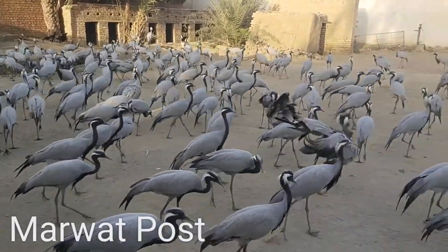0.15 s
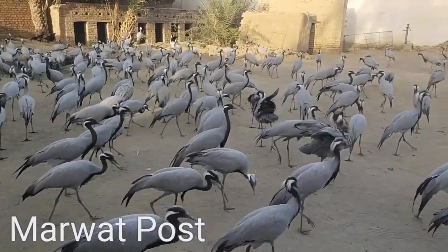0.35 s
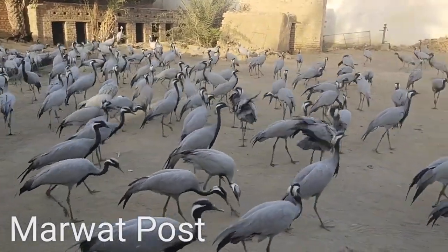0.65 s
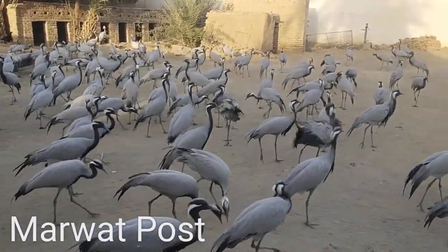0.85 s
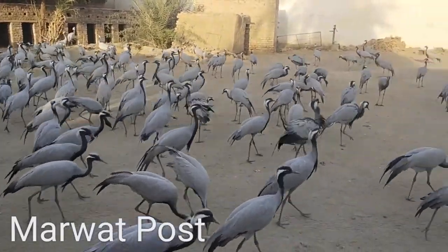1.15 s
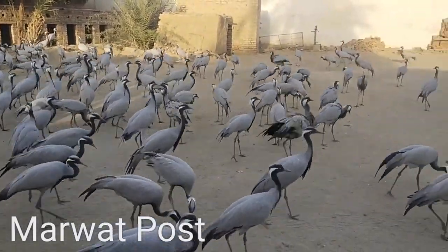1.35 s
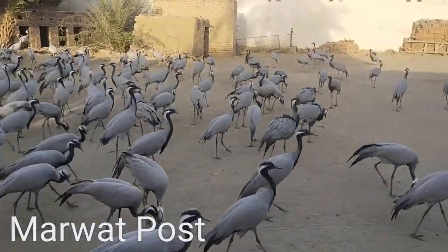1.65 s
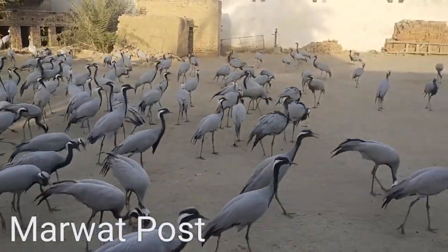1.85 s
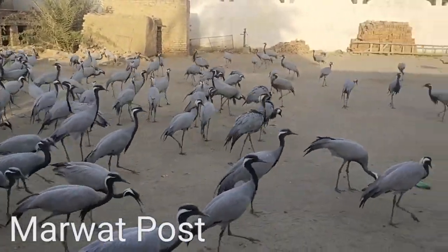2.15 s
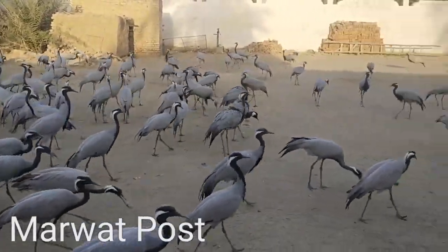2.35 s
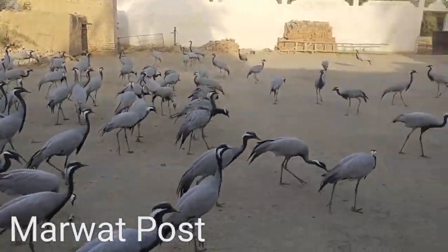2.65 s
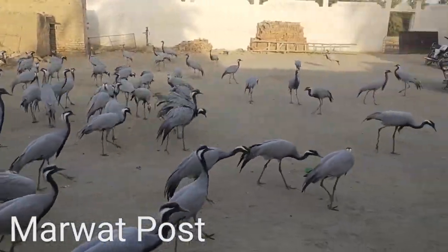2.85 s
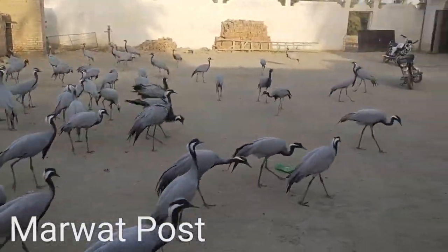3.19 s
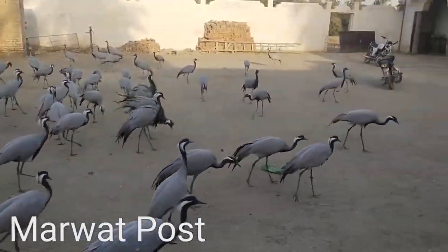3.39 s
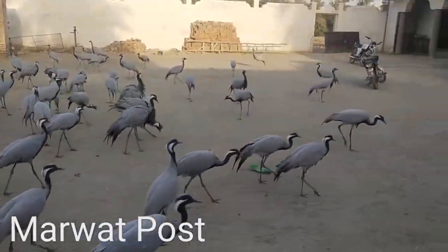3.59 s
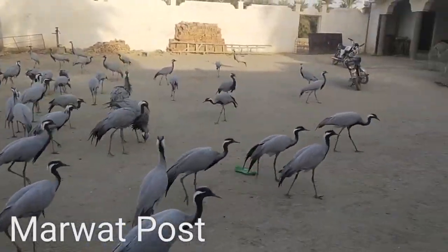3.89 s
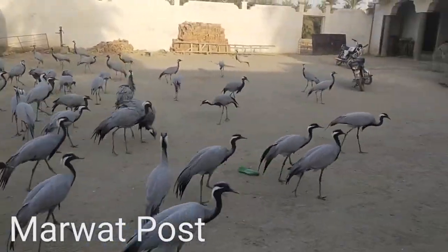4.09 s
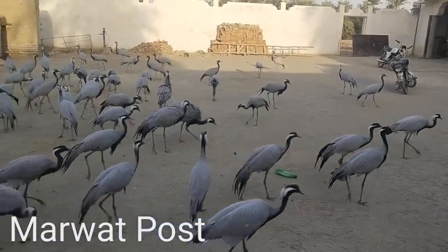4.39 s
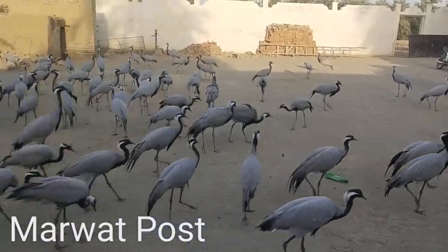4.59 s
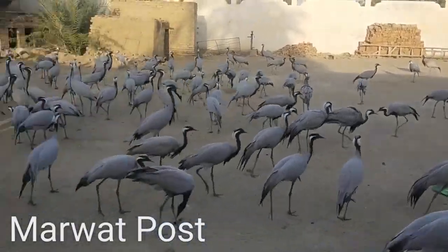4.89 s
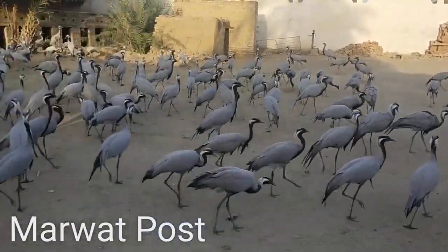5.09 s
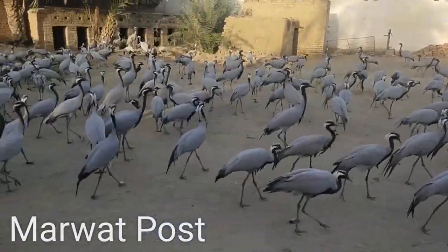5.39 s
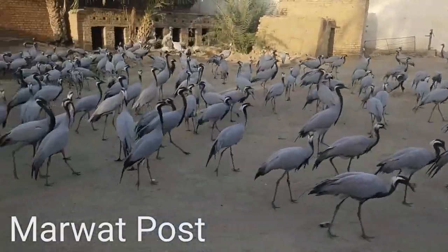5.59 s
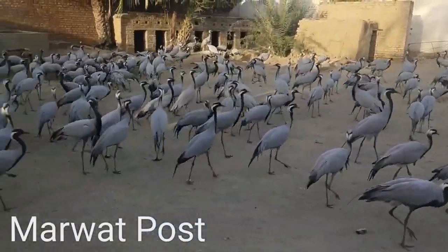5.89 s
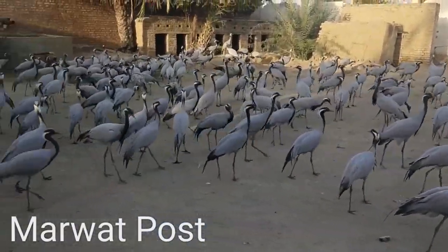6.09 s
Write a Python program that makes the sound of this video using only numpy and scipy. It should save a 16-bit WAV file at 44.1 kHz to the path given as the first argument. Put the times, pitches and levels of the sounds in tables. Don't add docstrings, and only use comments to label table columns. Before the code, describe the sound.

Scores of cranes call together in a walled dirt courtyard. Distant birds blur into a constant fluttering chorus, while nearer ones throw out short hoarse bugles and hard pulsed rattles. Breathy rasps burst from the closest throats. The clamour surges and dips, with brief hushes, over a faint low village hum. Close handheld stereo phone, slightly overloaded, with short wall echoes and a sparse, speckled treble.

```python
import sys
import numpy as np
from scipy import signal
from scipy.fft import rfft, irfft, next_fast_len
from scipy.io import wavfile
from scipy.ndimage import uniform_filter1d, map_coordinates

SR = 44100
rng = np.random.default_rng(int(sys.argv[2]) if len(sys.argv) > 2 else 0)


def gain_from_db(level_db):
    decades = np.asarray(level_db, float) / 20
    return 10 ** decades


def dump(signal):
    limited = np.clip(np.atleast_2d(signal).T, -1, 1)
    pcm = np.round(limited * 32767).astype(np.int16)
    wavfile.write(sys.argv[1], SR, pcm)


N = 275184


def unit(x):
    return x / np.sqrt(np.mean(x ** 2) + 1e-20)


def along(points, hz):
    f, v = np.transpose(points)
    return np.interp(np.log(hz + 1), np.log(f + 1), v)


def curve(rows):
    return np.interp(np.arange(N) / SR, *np.transpose(rows))


def bell(middle_s, half_s):
    return np.exp(-((np.arange(N) / SR - middle_s) / half_s) ** 2)


def wobble(rate_hz, size=N):
    knots = int(N * rate_hz / SR) + 4 if size == N else 400
    return map_coordinates(rng.standard_normal(knots), [np.arange(size) * rate_hz / SR])


def filtered(x, response):
    m = next_fast_len(N + 8192)
    return irfft(rfft(x, m) * response(np.fft.rfftfreq(m, 1 / SR)), m)[..., :N]


def noise(spectrum, alike):
    z = signal.stft(rng.standard_normal((2, N)), nperseg=512)[2]
    field = rng.standard_normal(z.shape[1:])
    field = uniform_filter1d(uniform_filter1d(field, size=5, axis=0), size=10, axis=1)
    patchy = signal.istft(z * gain_from_db(4.5 * unit(field)), nperseg=512)[1][:, :N]
    a, b = filtered(patchy, lambda hz: gain_from_db(along(spectrum, hz)))
    turn = np.arccos(np.clip(alike, 0, 1)) / 2
    common, differing = np.cos(turn) * a, np.sin(turn) * b
    return unit(np.array([common + differing, common - differing]))


# frequency in Hz, level in dB re first tone.
OVERTONES = [(1400, -8), (2600, -11), (3200, -21), (4800, -23), (7500, -30.5), (9000, -69)]
FLUTTER_SHARP = 1.5
OCTAVE_PIVOT = 2.6
FULL_FLUTTER_HZ = 1250


def cry(length_s, hz0, hz1, flutter_hz, flutter, hoarse, attack_s=0.028, shake_db=3, scoop=0.0336,
        dull_db=0):
    t = np.arange(int((length_s + 0.065) * SR)) / SR
    glide_hz = np.interp(t, [0, length_s], [hz0, hz1])
    waver = hoarse * max(FULL_FLUTTER_HZ / hz0, 1) ** 2 * wobble(140.03, size=len(t))
    pitch_hz = glide_hz * (1 - scoop * np.exp(-t / 0.02073) + waver)
    phase = 2 * np.pi * (np.cumsum(pitch_hz) / SR + rng.random())
    tone = np.sin(phase)
    for k in range(2, 6):
        overtone_db = along(OVERTONES, k * hz0) - dull_db * (k - OCTAVE_PIVOT)
        tone = tone + gain_from_db(overtone_db) * np.sin(k * phase)
    beat = 2 * np.pi * np.cumsum(flutter_hz * (1 + 0.027 * wobble(34.8, size=len(t)))) / SR
    depth = FLUTTER_SHARP * flutter * min(hz0 / FULL_FLUTTER_HZ, 1) ** 2
    shake = gain_from_db(shake_db * wobble(91.2, size=len(t)))
    voice = unit(tone * np.exp(depth * np.cos(beat)) * shake)
    return t, voice * np.clip(t / attack_s, 0, 1) * np.clip((length_s + 0.04 - t) / 0.043, 0, 1)


def chopped(t, rate_hz, rise, fall, leak):
    u = t * rate_hz % 1
    return unit(leak + np.clip(u / rise, 0, 1) * np.exp(-(u / fall) ** 2))


def add(out, s, sound, spread_db, spread_lag, place=None):
    pan, lag = rng.standard_normal(2) if place is None else place
    for c, sign in enumerate((1, -1)):
        start = round(s * SR + sign * spread_lag * lag)
        heard = sound[max(-start, 0):]
        out[c, max(start, 0):][:len(heard)] += gain_from_db(sign * spread_db * pan) * heard


# start in seconds,
# # length in seconds, first pitch in Hz, last pitch in Hz, level in dB.
NEAREST = [(-.04, 0.08, 1590, 1540, -15.5), (.045, .065, 1480, 1080, -18.5), (.15, 0.16, 1680, 1590, -29.5),
           (.66, 0.099, 1200, 1020, -26.5), (3.2, .1, 1420, 1130, -18.5), (4.68, 0.075, 3620, 3520, -34),
           (4.68, .09, 4750, 4650, -31.5), (4.81, 0.088, 5050, 5250, -28.5), (4.8, .16, 2550, 2500, -29),
           (5.72, 0.052, 2300, 2380, -27), (3.415, .12, 1265, 1310, -14.5), (2.5, .1, 700, 770, -31.5),
           (2.5, .2, 1560, 1600, -26.5), (.7, .06, 1100, 1060, -24), (5.13, 0.14, 1980, 1900, -27),
           (1, 0.066, 350, 450, -44), (3.14, 0.09, 770, 790, -25), (3.665, .015, 2050, 1950, -21),
           (3.675, .05, 2480, 2420, -21), (5.44, 0.1, 2340, 2260, -30), (3.928, 0.19, 834, 758, -30.5),
           (5.848, 0.11, 1459, 1387, -47), (0.7, .095, 940, 820, -21), (1.75, .16, 2466, 2286, -20.5),
           (1.745, 0.17, 1110, 1130, -23), (1.756, 0.16, 1330, 1410, -22), (2.448, 0.16, 1870, 1740, -20),
           (3.03, 0.1, 1800, 1560, -21), (3.14, 0.13, 1480, 1370, -13), (3.199, 0.15, 1259, 1100, -27),
           (3.418, 0.17, 1140, 1190, -18), (3.574, 0.1, 2290, 2460, -22), (3.674, 0.076, 817, 737, -24.5),
           (3.89, 0.1, 1600, 1540, -17), (4.64, 0.14, 1075, 1060, -20), (4.901, 0.16, 1560, 1520, -23.5),
           (5.073, 0.1, 2620, 2560, -23), (5.2, 0.07, 1620, 1590, -18), (6.032, 0.24, 1320, 1360, -17.5)]
NEAR_FLUTTER_HZ, NEAR_FLUTTER_DEPTH = 127.9, 0.66


def nearest():
    out = np.zeros((2, N + SR))
    for s, length_s, hz0, hz1, db in NEAREST:
        t, voice = cry(length_s, hz0, hz1, NEAR_FLUTTER_HZ, NEAR_FLUTTER_DEPTH, hoarse=.004,
                       attack_s=.012, shake_db=1.2)
        chop = chopped(t, 31, rise=.2, fall=.6, leak=1.7)
        add(out, s - .012, gain_from_db(db) * voice * chop, spread_db=1, spread_lag=.3)
    return out[:, :N]


# time in seconds, level in dB.
FLOCK = [(0, -17.5), (.28, -17), (.51, -13.5), (.8, -22), (1.15, -18), (1.5, -13.5), (2.05, -18.5),
         (2.51, -16), (2.95, -23), (3.21, -15), (3.38, -21), (3.7, -17.5), (4.05, -14.5), (4.6, -19),
         (5.24, -15.5), (5.76, -15), (6.01, -17), (6.24, -15.5)]
# middle in seconds, half length in seconds, depth in dB.
LULLS = [
    (0.994, 0.086, -2),
    (1.697, 0.15, -17),
    (2.244, 0.047, -5.5),
    (2.76, 0.11, -8),
    (3.794, 0.046, -42),
    (4.237, 0.065, -14),
    (5.455, 0.19, -11.5),
]


def flock_effort_db():
    return curve(FLOCK) + sum(db * bell(s, half_s) for s, half_s, db in LULLS)


def far_birds(count):
    out = np.zeros((2, N + SR))
    for when, how_long, high, glide, pace in rng.random((count, 5)):
        hz = 830 * 3.2 ** high ** .9
        t, voice = cry(.1 + .2 * how_long, hz, hz * (.86 + .17 * glide), flutter_hz=100 + 90 * pace,
                       flutter=0.51, hoarse=0.035)
        chop = chopped(t, 28 + 9 * pace, rise=0.37, fall=0.27, leak=0.32)
        add(out, when * (N / SR + .2) - .2, voice * chop, spread_db=3.0, spread_lag=8.4)
    out = out[:, :N]
    return out / np.sqrt(np.abs(uniform_filter1d(np.mean(out ** 2, 0), size=6000)) + 1e-9)


# time in seconds, turn away 0-1.
SWING = [
    (0, 0),
    (.8, 0),
    (1.7, 1),
    (3, 0.93),
    (4.2, 1),
    (5.4, 0.23),
    (6.24, 0.1),
]
# frequency in Hz, density in dB per Hz.
HUM = [(15, -62), (25, -32), (59, -27.5), (184, -6), (348, -17.5), (498, -9), (600, -6), (780, -7.5),
       (1320, -120)]
HUM_DB, HUM_SHADOW_DB = -45, -5.5
HUM_GROWS = 0.29


def hum(swell_db):
    hum_db = HUM_DB + HUM_SHADOW_DB * curve(SWING) + HUM_GROWS * swell_db
    return gain_from_db(hum_db) * noise(HUM, alike=0.85)


def pulsing(voices, power):
    energy = np.mean(voices ** 2, 0)
    quick, slow = (np.abs(uniform_filter1d(energy, size=n)) + 1e-7 for n in (130, 5000))
    return unit((quick / slow) ** power)


# time in seconds, peak in dB.
RASPS = [(0.019, -55), (0.4813, -32), (1.119, -24), (1.158, -24.5), (2.89, -21.5), (2.925, -22),
         (2.9527, -27), (3.878, -40), (4.136, -15.5), (4.1743, -14.5), (4.2037, -12.5), (4.2335, -12.5),
         (5.304, -36), (5.345, -32), (5.515, -27.5), (5.5478, -24.5), (5.585, -25), (5.6223, -22),
         (5.768, -19), (5.255, -35), (5.272, -33), (5.735, -27), (5.8, -24), (5.827, -32), (4.68, -29),
         (1.344, -37)]


def rasps():
    starts, t = np.zeros(N), np.arange(SR // 20) / SR
    s, db = np.transpose(RASPS)
    starts[np.round(s * SR).astype(int)] = gain_from_db(db - 5.0)
    burst = np.clip(t / 0.00082, 0, 1) * np.exp(-(t / 0.0053) ** 0.78)
    return signal.fftconvolve(starts, burst)[:N]


# middle in seconds, half length in seconds, air in dB,
# hiss over air in dB.
WHEEZES = [(0, 0.12, -33, -13), (0.508, 0.083, -28, -12), (1.1, 0.24, -33.5, -16), (1.51, 0.12, -32, -26),
           (1.862, 0.1, -34.5, -13), (2.207, 0.1, -33, -13), (2.545, 0.11, -27.5, -37),
           (2.969, 0.076, -24, -8.5), (3.18, 0.28, -37.5, -11), (3.63, 0.11, -29.5, -20),
           (4.083, 0.38, -44.5, -37), (4.722, 0.32, -26.5, -19), (5.295, 0.11, -26.5, -54),
           (5.57, 0.037, -47.5, 2), (5.763, 0.12, -28, -9), (6.24, 0.14, -41, -4)]
# frequency in Hz, density in dB per Hz.
AIR = [(1760, -14.5), (3250, 10.5), (3900, 8.5), (4970, 10.5), (6990, 2.5), (8000, -5), (10400, -18.5),
       (17600, -120)]
HISS = [(4820, -28), (8200, -7), (9120, -4), (10200, -2.5), (12500, -3), (15700, -14)]
AIR_DB, AIR_GROWS, HISS_DB, HISS_GROWS = -46.5, 2.65, -50, 1


def throat_air(voices, swell_db):
    bursts = rasps()
    airy = gain_from_db(AIR_DB + AIR_GROWS * swell_db)
    hissy = gain_from_db(HISS_DB + HISS_GROWS * swell_db)
    for s, half_s, db, hiss_over_air_db in WHEEZES:
        swell = bell(s, half_s)
        airy = airy + gain_from_db(db) * swell
        hissy = hissy + gain_from_db(db + hiss_over_air_db) * swell
    air = (gain_from_db(-3) * airy * pulsing(voices, power=.3) + gain_from_db(3) * bursts) * noise(AIR, alike=.5)
    hiss = (gain_from_db(-2.5) * hissy * pulsing(voices, power=.25) + bursts) * noise(HISS, alike=.35)
    return air + hiss


# start in seconds, length in seconds, first pitch in Hz, level in dB.
PLUNGING = [(.299, 0.25, 1640, -26), (1.109, 0.03, 930, -21), (1.165, .04, 880, -20),
            (1.246, 0.13, 1402, -20.5), (2.056, .11, 1340, -19.5), (2.292, 0.23, 1130, -24.5),
            (2.948, 0.095, 1194, -27), (3.981, .14, 1045, -30.5), (4.039, 0.056, 1420, -31),
            (4.605, 0.14, 1371, -20), (4.766, 0.23, 2643, -28), (4.95, .2, 927, -32),
            (5.103, 0.21, 1732, -27), (5.242, .17, 906, -26.5), (6.156, 0.088, 1794, -23)]
SAGGING = [(.288, 0.33, 2464, -26), (.299, 0.09, 1267, -20), (.396, 0.24, 1788, -25.5),
           (.785, 0.11, 1594, -24.5), (1.273, .03, 1566, -16), (1.35, .15, 1670, -26.5),
           (1.931, 0.07, 2260, -22), (1.985, 0.16, 1577, -22), (2.303, 0.092, 2200, -25),
           (2.8, .08, 2500, -28), (3.89, 0.09, 2500, -25), (4.502, 0.11, 1346, -25.5),
           (4.654, 0.12, 2340, -24), (5.642, 0.14, 810, -26)]
STEADY = [(.185, 0.046, 1620, -26), (.416, 0.14, 1153, -22.5), (.449, 0.15, 2162, -25),
          (.552, 0.13, 811, -26), (.82, 0.094, 2026, -22.5), (1.302, 0.26, 932, -29.5),
          (1.435, 0.14, 1253, -27), (1.441, 0.16, 2210, -28.5), (1.753, 0.15, 2080, -28),
          (1.943, 0.074, 756, -25.5), (2.152, 0.044, 1384, -24), (2.524, 0.089, 948, -25),
          (2.559, 0.025, 1520, -27), (2.559, 0.2, 1771, -31.5), (2.847, 0.11, 1500, -23),
          (2.96, .12, 1900, -26), (4.52, .12, 1550, -25), (4.33, .1, 1950, -27), (2.62, .12, 1500, -28),
          (3.158, 0.13, 2814, -24), (3.6, 0.069, 770, -24.5), (4.112, 0.037, 2246, -18.5),
          (4.513, 0.24, 1092, -27), (5.314, 0.084, 1587, -23.5), (5.647, 0.15, 1841, -24.5),
          (5.697, 0.053, 1048, -28), (5.935, 0.18, 1066, -31), (6.061, 0.28, 2266, -31.5)]
RISING = [(.035, 0.17, 1192, -27), (.077, 0.11, 1817, -33), (.362, 0.11, 747, -28.5),
          (.449, 0.061, 920, -27), (1.06, 0.098, 1288, -20.5), (1.145, 0.092, 1045, -31),
          (2.265, 0.24, 1332, -26), (2.814, 0.14, 1135, -23), (3.304, 0.12, 1270, -26),
          (3.592, 0.068, 1163, -26), (4.194, 0.077, 2095, -22), (4.76, 0.11, 1263, -20.5),
          (5.579, .12, 1413, -24), (6.036, 0.1, 2423, -29), (6.02, .12, 1120, -21)]
PLUNGE, SAG, DRIFT, RISE = .85, .94, 0.97, 1.075
FLUTTER_HZ, FLUTTER_SPREAD = 97.32, 2.2


def bugles():
    out = np.zeros((2, N + SR))
    for cries, glide in ((PLUNGING, PLUNGE), (SAGGING, SAG), (STEADY, DRIFT), (RISING, RISE)):
        for s, length_s, hz, db in cries:
            flutter_hz = FLUTTER_HZ * FLUTTER_SPREAD ** (rng.random() ** 1.542)
            t, voice = cry(length_s, hz, glide * hz, flutter_hz, flutter=.7, hoarse=.009)
            chop = chopped(t, rng.uniform(28, 36), rise=.2, fall=.6, leak=.9)
            add(out, s - .016, gain_from_db(db + 1.0) * voice * chop, spread_db=0.5, spread_lag=1.2)
    return out[:, :N]


# first pulse in seconds, last pulse in seconds, peak in dB,
# main tone in Hz, second tone in Hz.
RATTLES = [(.447, .575, -12.5, 2130, 2600), (.659, .659, -13.5, 1673, 2280), (0.914, .915, -10, 1560, 2500),
           (0.949, 1.015, -5, 1530, 1280), (.396, .428, -13, 1800, 2300), (1.047, 1.047, -8.5, 1380, 2830),
           (1.312, 1.374, -12.5, 1794, 1520), (1.118, 1.16, -8, 1900, 930), (1.511, 1.574, -13, 2260, 1000),
           (1.605, 1.637, -10, 2208, 977), (2.089, 2.088, -9.5, 2815, 1340), (2.121, 2.206, -8, 1442, 1180),
           (2.122, 2.207, -8, 2700, 2480), (2.447, 2.474, -9, 1846, 2010), (2.326, 2.366, -9, 1456, 2177),
           (2.511, 2.61, -10.5, 1830, 1510), (2.815, 2.975, -10.5, 1170, 1450),
           (2.868, 3.02, -13, 2300, 2620), (3.037, 3.105, -13.5, 1692, 1910),
           (3.143, 3.182, -5, 1480, 2900), (3.175, 3.256, -13, 2780, 2520), (3.53, 3.593, -11, 1190, 1320),
           (3.666, 3.707, -11, 1956, 1010), (3.68, 3.712, -10, 2460, 828),
           (3.847, 3.846, -16.5, 1670, 2540), (3.883, 3.884, -12, 1585, 1050),
           (3.985, 4.035, -14, 1020, 1600), (4.143, 4.142, -8.5, 1287, 2620),
           (4.177, 4.234, -6, 1420, 2600), (4.21, 4.268, -13, 2220, 2520), (4.352, 4.352, -12, 2170, 2020),
           (4.42, 4.453, -17.5, 2260, 960), (4.595, 4.595, -8, 1450, 2230),
           (5.305, 5.305, -5.5, 2125, 1914), (5.347, 5.347, -10, 864, 2230),
           (5.545, 5.622, -16, 2910, 1450), (5.642, 5.642, -9.5, 1860, 863),
           (5.675, 5.709, -9.5, 1860, 814), (5.768, 5.828, -11.5, 2342, 1450),
           (6.155, 6.155, -11, 1407, 2300)]
PULSE_GAP_S = .032
SECOND_TONE_DB, RATTLE_SAG, RATTLE_FADE_DB = -8, .008, .4


def snap(main_hz, second_hz):
    t, main = cry(.03, main_hz, .82 * main_hz, flutter_hz=150, flutter=.15, hoarse=.016,
                  attack_s=.0018, shake_db=1, scoop=0, dull_db=9)
    t, second = cry(.03, second_hz, .88 * second_hz, flutter_hz=150, flutter=.25, hoarse=.02,
                    attack_s=.0018, shake_db=1, scoop=0, dull_db=7)
    decay = .7 * np.exp(-(t / .0085) ** 3) + .3 * np.exp(-t / .014)
    pulse = (main + gain_from_db(SECOND_TONE_DB) * second) * decay
    return pulse / np.abs(pulse).max()


def rattles():
    out, others_gain = np.zeros((2, N + SR)), np.ones(N)
    closing = .9 * np.hanning(int(.026 * SR))
    for first, last, db, main_hz, second_hz in RATTLES:
        place = rng.standard_normal(2)
        count = round(abs(last - first) / PULSE_GAP_S) + 1
        for k, s in enumerate(np.linspace(first, last, count)):
            sag = 1.02 - RATTLE_SAG * k
            pulse = gain_from_db(db - RATTLE_FADE_DB * k) * snap(sag * main_hz, sag * second_hz)
            add(out, s - .001, pulse, spread_db=0.7, spread_lag=.25, place=place)
            end = round((s + 0.0048) * SR)
            hush = np.clip((db + 17) / 8, .2, 1)
            others_gain[end - len(closing):end] *= 1 - closing * hush
    return out[:, :N], others_gain


# frequency in Hz, t60 in seconds.
YARD = [(300, 0.61), (8000, 0.23)]


def yard(x):
    hz, t, z = signal.stft(rng.standard_normal((2, SR // 2)), SR, nperseg=256)
    decay = gain_from_db(-60 * t / along(YARD, hz)[:, None])
    tail = signal.istft(z * decay, SR, nperseg=256)[1]
    late = np.pad(x, ((0, 0), (350, 0)))
    return signal.fftconvolve(late, tail / np.linalg.norm(tail[0]), axes=1)[:, :N]


LAG_S = 0.00052


def left_delay(hz):
    return np.exp(-2j * np.pi * LAG_S * hz / (1 + (1080 / (hz + 1)) ** 8))


def scene():
    far_db = flock_effort_db()
    swell_db = far_db - far_db.mean()
    chorus = gain_from_db(far_db - 6.5) * far_birds(count=380)
    pulses, others_gain = rattles()
    voices = pulses + others_gain * (bugles() + nearest() + chorus)
    voices = filtered(voices, lambda hz: 1 / (1 + (560 / (hz + 1)) ** 8))
    flock = voices + throat_air(voices, swell_db)
    flock = flock + gain_from_db(-8.5) * yard(flock - 0.66 * pulses)
    flock[0] = filtered(flock[0], left_delay)
    return flock + hum(swell_db)


# frequency in Hz, threshold re neighbours' rms below which a cell is silent.
THINNING = [(3100, .25), (6500, .55), (8300, 1.15), (14000, 1.35)]


def thinned(x):
    hz, _, z = signal.stft([x[0] + x[1], x[0] - x[1]], SR, nperseg=2048)
    power = uniform_filter1d(uniform_filter1d(np.abs(z) ** 2, size=30, axis=1), size=3, axis=2)
    around = np.sqrt(power + 1e-20)
    strong = np.abs(z) > around * along(THINNING, hz)[:, None]
    keep = strong | (hz[:, None] < THINNING[0][0])
    mid, side = signal.istft(z * keep, SR, nperseg=2048)[1][:, :N]
    return np.array([mid + side, mid - side]) / 2


# frequency in Hz, left minus right in dB.
PORTS = [(100, 0), (700, -3), (1290, 3.5), (2380, 6), (4400, -3.5), (8120, -5.5), (15000, 5)]


def ports(x):
    return filtered(x, lambda hz: gain_from_db(along(PORTS, hz) * np.array([[.5], [-.5]])))


def overloaded(x):
    excess = x - x / (1 + np.abs(x / .88) ** 8) ** (1 / 8)
    return x - filtered(excess, lambda hz: hz > 550)


def top_cut(x):
    return signal.sosfilt(signal.butter(12, 16270, fs=SR, output="sos"), x)


def record(dry):
    x = overloaded(ports(dry))
    x = filtered(x, lambda hz: (hz < 15850) / (1 + (50 / (hz + 1)) ** 4))
    return top_cut(thinned(x))


dry = scene()
out = record(dry)
dump(out)
```